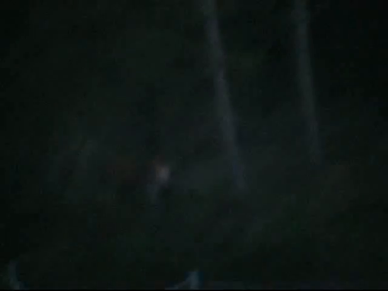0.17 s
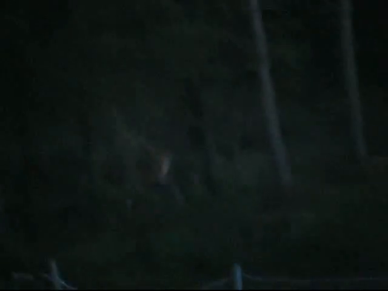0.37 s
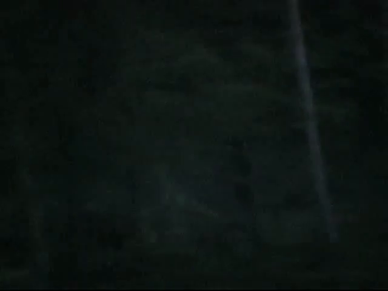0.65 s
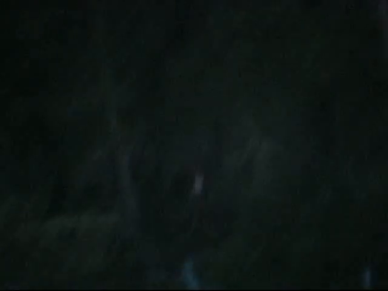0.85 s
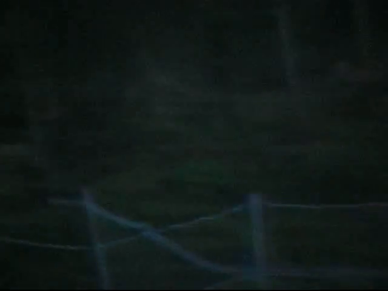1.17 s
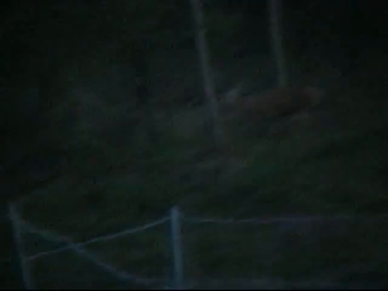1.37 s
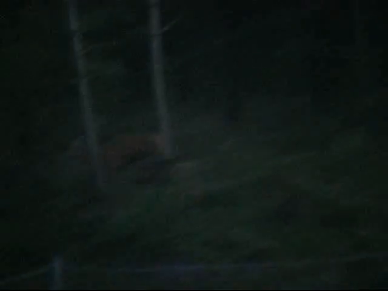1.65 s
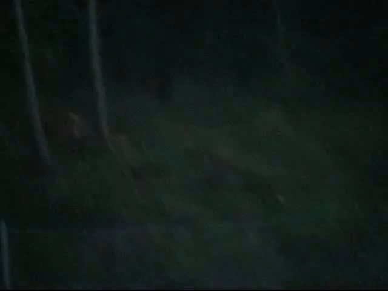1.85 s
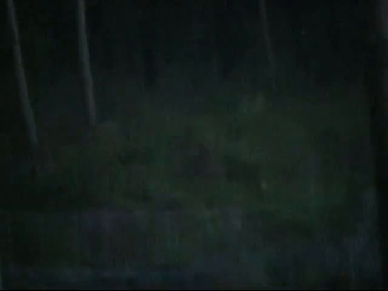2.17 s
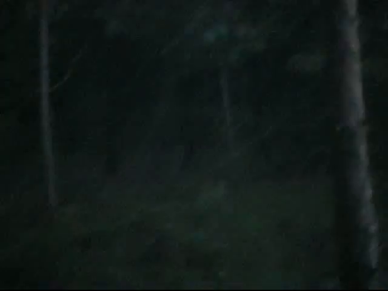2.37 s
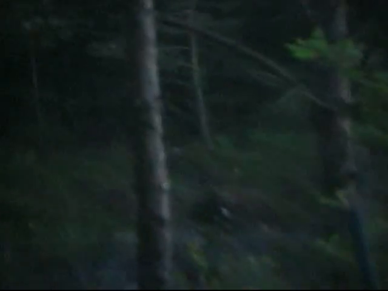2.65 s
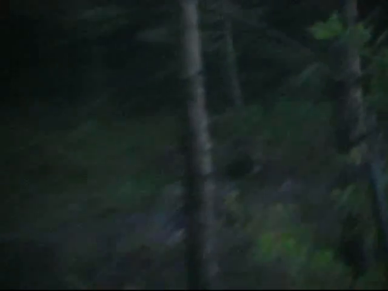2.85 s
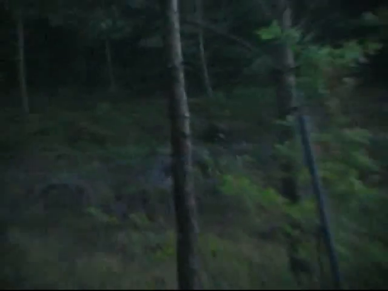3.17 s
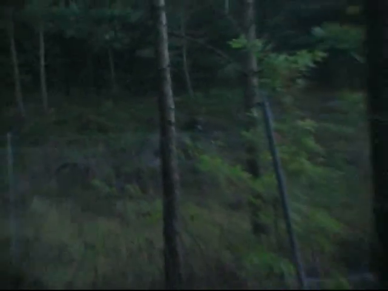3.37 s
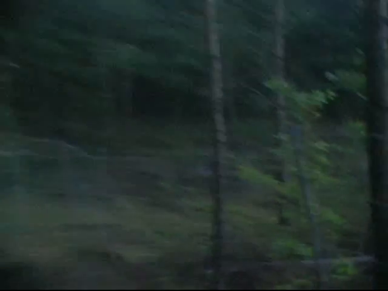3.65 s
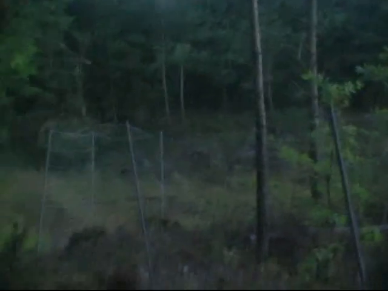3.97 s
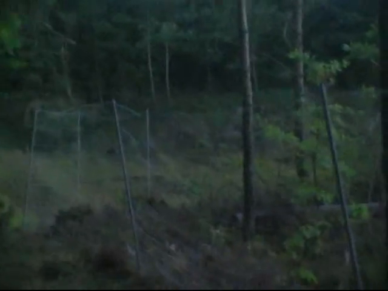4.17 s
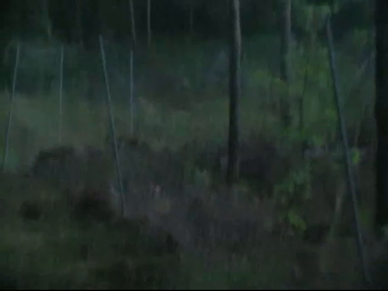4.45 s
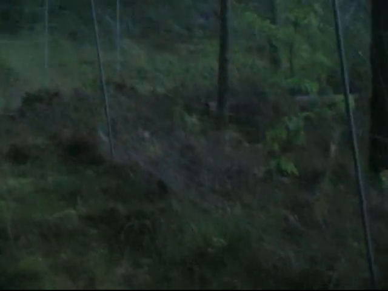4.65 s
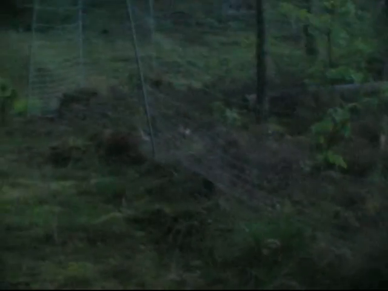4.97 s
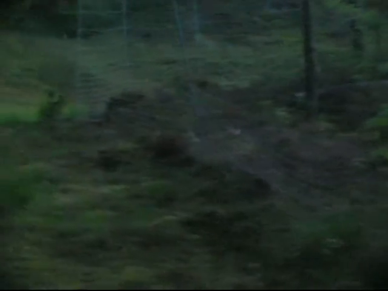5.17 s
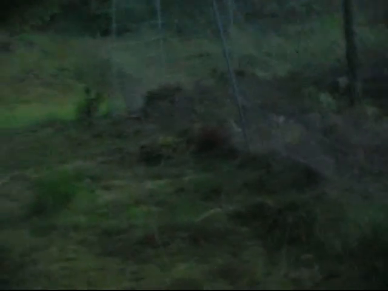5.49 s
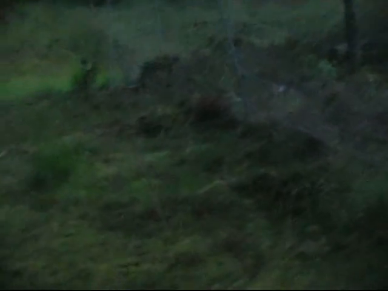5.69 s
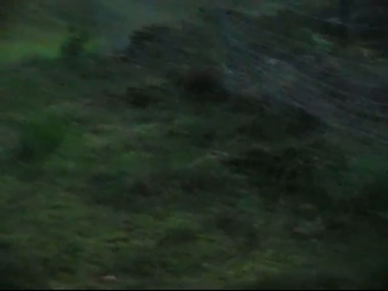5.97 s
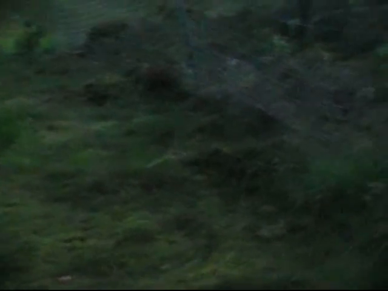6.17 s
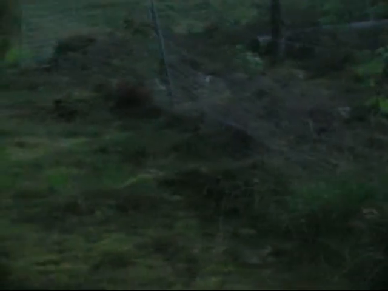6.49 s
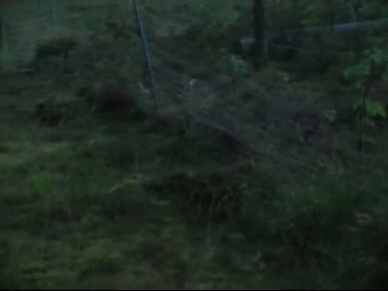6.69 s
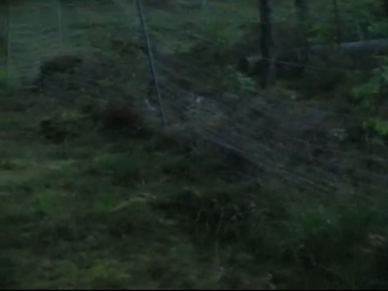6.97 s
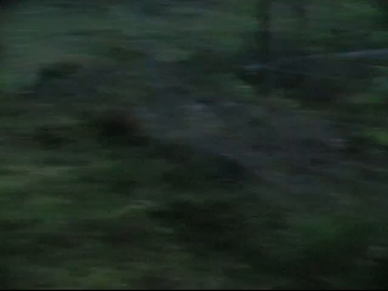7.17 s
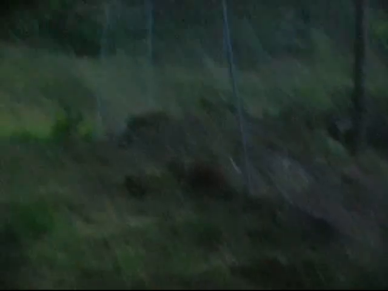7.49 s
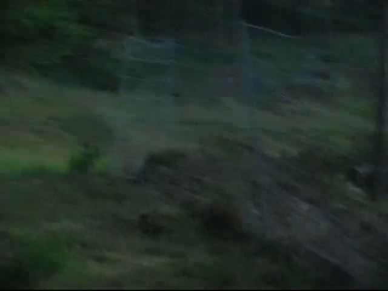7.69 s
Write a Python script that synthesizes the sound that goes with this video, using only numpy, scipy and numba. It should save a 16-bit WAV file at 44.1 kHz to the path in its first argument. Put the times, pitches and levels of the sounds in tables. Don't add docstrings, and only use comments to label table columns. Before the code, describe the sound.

Mono hand-held microphone outdoors: low wind thumps, steady hum and dull hiss throughout. After a far groan, a stag gives a rough, deep roar that breaks into hoarseness, then a shorter, purer bellow. Thin distant moans drift behind. Hands click and bump the casing, hardest midway, clothing rubs and leaves shuffle; a short creaking growl and a weak new roar close the scene.

```python
import sys
import numpy as np
from scipy import signal
from scipy.fft import rfft, irfft
from scipy.io import wavfile
from scipy.ndimage import uniform_filter1d, map_coordinates
from numba import njit

SR = 44100
rng = np.random.default_rng(int(sys.argv[2]) if len(sys.argv) > 2 else 0)


def transcribe(u):
    v = np.clip(np.atleast_2d(u).T, -1, 1)
    q = np.round(v * 32767).astype(np.int16)
    wavfile.write(sys.argv[1], SR, q)


def amplitude_ratio(level_db):
    exponent = np.asarray(level_db, float) / 20
    return 10 ** exponent


N = 345258


def rms_one(x):
    return x / np.sqrt(np.mean(x ** 2) + 1e-20)


def in_time(rows):
    s, *columns = np.transpose(rows)
    return [np.interp(np.arange(N) / SR, s, c) for c in columns]


def gate(rows, fade_s=0.012):
    t = np.arange(N) / SR
    return np.clip(np.minimum(t - rows[0][0], rows[-1][0] - t) / fade_s, 0, 1)


def at_hz(points, hz):
    point_hz, point_value = np.transpose(points)
    return np.interp(np.log(hz + 1), np.log(point_hz), point_value)


def drift(rate):
    knots = rng.standard_normal(400)
    return map_coordinates(knots, [np.arange(N) / SR * min(rate, 45)], order=3)


def coloured(spectrum):
    closed = [(spectrum[0][0] / 2, -60), *spectrum, (spectrum[-1][0] * 2, -90)]
    even = N + N % 2
    gain = amplitude_ratio(at_hz(closed, np.fft.rfftfreq(even, 1 / SR)))
    return rms_one(irfft(rfft(rng.standard_normal(even)) * gain)[:N])


def swells(rows, floor_db):
    t = np.arange(0, N + 64, 64) / SR
    power = amplitude_ratio(2 * floor_db)
    power = power + sum(amplitude_ratio(2 * db - 20 * np.abs(t - s) / fall_s) for s, db, fall_s in rows)
    return np.interp(np.arange(N) / SR, t, 10 * np.log10(power))


@njit
def resonate(x, w, r):
    y = np.zeros(len(x))
    for i in range(2, len(x)):
        y[i] = (1 - r * r) / 2 * (x[i] - x[i - 2]) + 2 * r * np.cos(w[i]) * y[i - 1] - r * r * y[i - 2]
    return y


def peak(x, hz, width_hz):
    return resonate(x + 1e-18, 2 * np.pi * hz / SR * np.ones(len(x)), np.exp(-np.pi * width_hz / SR))


def glottis(span, rate, rough, lead_s):
    turns = np.cumsum(rate * (1 + 0.25 * rough ** 2 * drift(40)[span])) / SR
    turns -= turns[int(lead_s * SR)]
    closing = np.diff(np.floor(turns), prepend=0) > 0
    strength = amplitude_ratio((0.27 + 3.2 * rough) * rng.standard_normal(200)[turns.astype(int) % 200])
    puff = rng.standard_normal(N)[span] * np.exp(-1.8 * (turns % 1))
    pulses = -strength * (1 - rough) * closing * np.sqrt(SR / rate)
    breath = strength * 1.8 * rough * puff
    return pulses, breath


GROUP_BORDERS_HZ = [720, 1450]


def ring_throat(pulses, breath, span, rough, lowered, shut, throat, shut_db):
    valley_fill = 0.17
    groups = np.zeros((3, len(pulses)))
    for k, (raised_hz, lowered_hz, width_hz, raised_db, lowered_db) in enumerate(throat):
        hz = raised_hz + (lowered_hz - raised_hz) * lowered
        hz = hz * (1 + 0.021 * rough * drift(14)[span])
        source = pulses + breath * (raised_hz / 900) ** 0.36
        broad = peak(source, hz, 4.15 * width_hz)
        rung = peak(broad, hz, width_hz) + valley_fill * rough * peak(broad, hz, 6.0 * width_hz)
        db = raised_db + (lowered_db - raised_db) * lowered + shut_db[k] * shut
        db = db + (1.5 + 2.4 * rough) * drift(9)[span]
        group = np.searchsorted(GROUP_BORDERS_HZ, raised_hz)
        groups[group] += (-1) ** k * amplitude_ratio(db) * rung / np.sqrt(width_hz)
    return groups / np.sqrt(uniform_filter1d(groups ** 2, size=3000, axis=1) + 1e-9)


# (return time [s], depth [dB], fade [s])
CATCHES = [
    (1.678, -8, .03),
    (1.744, -5, .02),
    (1.792, -5, .015),
    (1.815, -9, .015),
    (1.908, -9, .04),
    (2.03, -4, .03),
    (2.24, -5, .08),
]


def roar(effort, sinking, strain, throat, shut_db, jaw_s):
    jaw_takes_s = 0.03
    hoarse_start, settle_s = 1.4, 0.1
    pure_until, pure_fade = 0.62, 0.15
    span = slice(int(effort[0][0] * SR), int(effort[-1][0] * SR) + 2000)
    t = (np.arange(N) / SR)[span]
    rate, level_db, mouth_db = [c[span] for c in in_time(effort)]
    first_s, sink_s, sink_takes_s, high_raised_db, high_lowered_db = sinking
    steady, strained, break_s, break_takes_s, pure_db = strain

    lowered = np.clip((t - sink_s) / sink_takes_s, 0, 1)
    shut = np.clip((jaw_s - t) / jaw_takes_s + 0.5, 0, 1)
    broken = np.clip((t - break_s) / break_takes_s, 0, 1)
    hoarse = 1 + hoarse_start * np.exp((t[0] - t) / settle_s)
    rough = steady * hoarse + (strained - steady) * broken

    pulses, breath = glottis(span, rate, rough, first_s - effort[0][0])
    low, middle, high = ring_throat(pulses, breath, span, rough, lowered, shut, throat, shut_db)
    pure = np.clip((pure_until - rough) / pure_fade, 0, 1) * np.sqrt(2)
    pure = pure * np.sin(2 * np.pi * np.cumsum(rate) / SR)

    for s, db, fade_s in CATCHES:
        level_db = level_db + db * (t < s) * np.exp(-np.abs(t - s) / fade_s)
    high_db = high_raised_db + (high_lowered_db - high_raised_db) * lowered
    voice = amplitude_ratio(-mouth_db) * (low + amplitude_ratio(pure_db) * pure) + middle + amplitude_ratio(high_db) * high
    out = np.zeros(N)
    out[span] = amplitude_ratio(level_db) * voice
    return out * gate(effort)


# (time [s], pulse rate [1/s], level [dB], middle over low resonances [dB])
HARSH = [(1.54, 71, -69, -10), (1.57, 85, -54, -12), (1.69, 94, -36, -4), (1.8, 81, -33.5, -4.5),
         (1.95, 97, -34, -4), (2.04, 102, -34.5, -7), (2.1, 110, -32, -7.5), (2.36, 109, -38.5, -3),
         (2.47, 110, -46, -4)]
BRIGHT = [(3.01, 30.02, -74, -6), (3.05, 64, -47.5, 5), (3.11, 89, -45, 9), (3.19, 96, -39, 13),
          (3.27, 93.9, -38.5, 11), (3.53, 102.5, -37.5, 1), (3.66, 93, -39, -2.5), (3.728, 82, -44.5, 6),
          (3.76, 66, -67, -5)]
GROWL = [(5.93, 46, -73, 1), (5.968, 46, -46.5, 6), (6.121, 45.5, -43, 9), (6.163, 28, -46, 4),
         (6.19, 38, -49, 0), (6.26, 38, -47, -0.5), (6.355, 59, -44.5, -1), (6.368, 28, -50, -5),
         (6.6, 14, -68, -10)]
FOURTH = [(7.47, 88, -70, -7), (7.52, 92, -60, -4), (7.58, 100, -60, 2), (7.7, 103, -61, 3),
          (7.829, 101.3, -59, 0)]
GRUNT = [(1.33, 95, -76, -6), (1.42, 94, -61, 10), (1.484, 92, -62.5, 14), (1.54, 90, -63.5, 0.5)]
EFFORT = [HARSH, BRIGHT, GROWL, FOURTH, GRUNT]
# (first closure [s], sinking starts [s], sinking takes [s],
# high over middle resonances raised [dB], lowered [dB])
SINKING = [
    (1.55, 1.63, .4, -12, -9.5),
    (3.027, 2.98, 0.71, 0, -0.7),
    (5.945, 5.99, 0.265, -13, -1),
    (7.49, 7.49, .24, 2, 6),
    (1.37, 1.37, .19, 4, 4),
]
# (steady roughness [0-1], strained roughness [0-1], voice breaks [s],
# breaking takes [s], pure fundamental under the low resonances [dB])
STRAIN = [
    (.32, .76, 2.0, .12, -10),
    (.07, .21, 3.6, .11, -9),
    (.22, .46, 6.17, .26, -30),
    (.2, .2, 7.8, .1, -25),
    (.4, .6, 1.4, .1, -12),
]
# (larynx raised [Hz], lowered [Hz], width [Hz], level raised [dB], lowered [dB])
HARSH_THROAT = [(469, 385.4, 52, 2, 0), (712, 500, 45, 0, -0.5), (1120, 769, 55, 2.5, -7),
                (1235, 1094, 59, -3, -2.5), (1447, 1253, 49, -20, -10), (1612, 1410, 46, -19, -14),
                (1980, 1620, 25, -26.5, -22.5), (2246, 1930, 25, -20, -22.5), (2370, 2200, 84, -21, -18.5),
                (2626, 2420, 80, -24, -19.5), (2950, 2830, 130, -30, -27), (3355, 3316, 86, -32, -27),
                (4100, 3900, 500, -38, -40), (5700, 5570, 1000, -42, -45)]
BRIGHT_THROAT = [(222, 210, 88, -6, -14), (540, 465, 46, 0, 3), (793, 725, 53, -7.5, -3.5),
                 (1156, 1103, 100, -12, -4), (1352, 1252, 44, 0.5, -4.5), (1698, 1540, 61, -3, 0.5),
                 (1985, 1926, 93, -1.5, -7), (2170, 2140, 41, -14, -5), (2460, 2427, 70, 0, -5.5),
                 (2770, 2750, 30, -25, -17), (3260, 3150, 64, -22, -15)]
GROWL_THROAT = [(426, 381.5, 35, -18, -4), (600, 514, 38, -6, -5), (971, 836, 26, 1.5, 0),
                (1076, 995, 52, -2.5, -8), (1414, 1260, 29, -11.5, -6), (1673, 1520, 28, -12, -12),
                (1820, 1790, 70, -33, -12), (2280, 2130, 33, -20, -13.5), (2350, 2330, 51, -13, -14),
                (2520, 2480, 75, -17, -14.5), (2890, 3100, 36, -30, -26.5), (3340, 3250, 82, -27, -30.5)]
FOURTH_THROAT = [(477, 470, 150, 0, -6), (820, 740, 160, -1, -6), (1370, 1320, 300, -3, -6),
                 (2280, 2240, 200, 4, 2), (2790, 2740, 290, -3, -1), (3200, 3180, 260, -2, 0),
                 (4500, 4500, 370, -21, -23)]
GRUNT_THROAT = [(500, 990, 140, -0.5, 4), (900, 1100, 480, 0, 0), (1820, 1700, 210, 2, -1),
                (2040, 2080, 190, 9, 1)]
THROAT = [HARSH_THROAT, BRIGHT_THROAT, GROWL_THROAT, FOURTH_THROAT, GRUNT_THROAT]
HARSH_SHUT = [1, 1, -1, 1, 2, 2, 4, -1, -2, -1, -3, -3, -1, -1]
BRIGHT_SHUT = [1, 1, 1, -5, -9, 6, 2, 1, -2, -3, -10]
GROWL_SHUT = [-1, 1, 1, 1, 1, 1, -2, -2, -2, 1, -1, 1]
FOURTH_SHUT = [1, 1, 1, -1, -1, -1, -1]
GRUNT_SHUT = [1, 1, -3, -3]
SHUT_JAW = [HARSH_SHUT, BRIGHT_SHUT, GROWL_SHUT, FOURTH_SHUT, GRUNT_SHUT]
JAW_DROPS_S = [1.675, 3.16, 6.22, 7.56, 1.42]


def roars():
    tables = zip(EFFORT, SINKING, STRAIN, THROAT, SHUT_JAW, JAW_DROPS_S)
    return np.array([roar(*each) for each in tables])


# (frequency [Hz], time to fall 60 dB [s])
FOREST_T60 = [(200, 2.8), (500, 3.08), (1200, 1.62), (1700, 1.85), (2500, 1.56), (3500, 1.93), (6000, 0.66)]
SCATTER_DB = [-6, -10, -8.5, -5.5, -4.5]


def forest(calls):
    trunk_delay_s = 0.026
    t, tail = np.arange(3 * SR) / SR, 0
    edges = 150 * 2 ** np.arange(0, 6, 0.5)
    for low, high in zip(edges, edges[1:]):
        half_octave = signal.butter(2, [low, high], "band", fs=SR, output="sos")
        band = signal.sosfilt(half_octave, rng.standard_normal(len(t)))
        tail = tail + band * amplitude_ratio(-60 * t / at_hz(FOREST_T60, np.sqrt(low * high)))
    tail *= 1 - np.exp(-(t / trunk_delay_s) ** 2)
    tail /= np.sqrt(np.sum(tail ** 2) * SR / 2 / edges[-1])
    return signal.fftconvolve(amplitude_ratio(np.array(SCATTER_DB)) @ calls, tail)[:N]


# (time [s], pitch [Hz], level [dB])
MOANS = [
    [(2.55, 214, -53), (2.9, 199.9, -54), (2.948, 174, -63), (3.0, 175, -46)],
    [(3.3, 202, -49), (3.43, 207.6, -44.5), (3.704, 224, -48.5), (3.76, 225, -48)],
    [(5.97, 173, -46.5), (6.166, 176, -58), (6.214, 184, -58), (6.3, 173, -51)],
]
# (time [s], level [dB])
GROAN = [
    (0.75, -92),
    (0.794, -74),
    (0.884, -92),
    (0.938, -59.5),
    (1.404, -61),
    (1.5, -88),
]


def far_animals():
    groan = rms_one(peak(rng.standard_normal(N), 370, 44))
    out = amplitude_ratio(in_time(GROAN)[0]) * gate(GROAN, 0.065) * groan
    for rows in MOANS:
        hz, db = in_time(rows)
        partial = np.sqrt(2) * np.sin(2 * np.pi * np.cumsum(hz) / SR)
        out += amplitude_ratio(db + 1.4 * drift(14)) * gate(rows, 0.027) * partial
    return out


# (time [s], shell peak [dB], thud [dB], snap [dB], length [s])
KNOCKS = [(0.163, -45.5, -55, -57.5, 0.019), (.589, -50, -30.5, -75, 0.028), (2.298, -42, -31, -63, 0.034),
          (2.904, -42, -50, -62, .008), (3.009, -38, -35, -64, .02), (4.097, -35, -38, -55, 0.012),
          (4.361, -40, -50, -50.5, 0.0039), (4.501, -20, -32, -35.5, 0.0076),
          (4.508, -20, -26.5, -44, 0.0082), (4.518, -27, -33, -45, 0.0095),
          (4.567, -39.5, -38.5, -54, .008), (4.608, -29.5, -50, -55, 0.0034), (4.635, -54, -55, -45, .006),
          (4.647, -37, -56, -40, 0.006), (5.452, -27, -42.5, -49, 0.003), (5.633, -41, -62, -70, 0.0073),
          (5.729, -35.5, -57, -54, 0.0052), (7.249, -49, -51, -69, 0.012), (7.5, -40, -35, -53, 0.0094)]
# (frequency [Hz], level [dB], time to fall 60 dB [s])
CASING = [(98.5, -1, 0.066), (190.5, 2, 0.058), (271, -8, 0.036), (420, -7, .02), (600, -1, 0.024),
          (750, -1, .028), (960, -17, 0.012), (1650, -7, .006), (2350, 1.5, 0.008), (3500, -7, 0.0073),
          (4800, -7, 0.0062)]
SHELL_HZ = [350, 1300]


def knocks():
    size = 8000
    out, t = np.zeros(N + size), np.arange(size) / SR
    for s, shell_db, thud_db, snap_db, length in KNOCKS:
        start = int(s * SR)
        contact = rng.standard_normal(size) * np.exp(-t / max(length, 0.001) * 2.0)
        contact = contact * np.minimum(t / 0.0006, 1)
        for hz, db, t60 in CASING:
            rung = peak(peak(contact, hz, 0.32 * hz), hz, 2.54 / t60)
            part_db = (thud_db, shell_db - 5.5, snap_db)[np.searchsorted(SHELL_HZ, hz)]
            out[start:start + size] += amplitude_ratio(db + part_db) * rung / np.abs(rung).max()
    return signal.sosfilt(signal.butter(3, 5600, fs=SR, output="sos"), out[:N])


# (time [s], peak [dB], centre [Hz])
TICKS = [(.277, -50.5, 3500), (.314, -55, 4700), (1.41, -60, 3980), (1.895, -45, 5000), (3.266, -55, 6000),
         (3.307, -60, 6500), (3.425, -55, 5510), (3.48, -59, 9000), (3.659, -47, 11500), (4.109, -56, 4500),
         (4.428, -58, 9000), (4.461, -53, 5500), (5.25, -59, 9000), (5.31, -59, 11000), (5.37, -55, 12000),
         (5.464, -54, 4700), (5.702, -45, 3600), (5.799, -52, 9900), (6.259, -60, 9000), (6.399, -57, 4200),
         (7.497, -58, 7000)]


def ticks():
    size = 900
    out, t = np.zeros(N + size), np.arange(size) / SR
    for s, db, hz in TICKS:
        start = int(s * SR)
        burst = rng.standard_normal(size) * np.exp(-t / 0.0012)
        burst = peak(peak(burst, hz, 1.0 * hz), hz, 0.62 * hz)
        out[start:start + size] += amplitude_ratio(db + 2) * burst / np.abs(burst).max()
    return out[:N]


# (time [s], peak [dB])
JINGLES = [
    (4.402, -66),
    (4.414, -60),
    (4.428, -56),
]
# (frequency [Hz], level [dB], time to fall 60 dB [s])
RING = [(7700, 0, .05), (9300, -7, .06)]


def strap_ring():
    t, out = np.arange(N) / SR, np.zeros(N)
    for s, db in JINGLES:
        for hz, mode_db, t60 in RING:
            level = amplitude_ratio(db + mode_db - 60 * np.abs(t - s) / t60)
            out += (t > s) * level * np.sin(2 * np.pi * hz * (t - s))
    return out


# (centre [Hz], width [Hz], level [dB])
LENS = (1500, 350, -55.5)


def lens():
    start_s, steps_per_s = 7.503, 20
    hz, width_hz, db = LENS
    step = (np.arange(N) / SR - start_s) * steps_per_s
    strokes = (step > -0.5) * np.exp(-(((step + 0.5) % 1 - 0.5) / 0.16) ** 2)
    return amplitude_ratio(db) * strokes * rms_one(peak(rng.standard_normal(N), hz, width_hz))


# (time [s], peak [dB], time to fall 10 dB [s])
RUBS = [(.33, -74, 0.1), (1.63, -69, 0), (1.9, -71, 0.5), (3.27, -72, 0.3), (3.47, -67.5, 0.4),
        (4.43, -66, 0.18), (5.3, -71, 0.34), (5.79, -65.5, 0.17), (6.41, -67, 0.25), (7.68, -68, 0.25)]
# (frequency [Hz], density [dB per Hz])
RUSTLE = [(2500, 2.5), (4000, 0), (6000, -3.5), (9000, -11.5), (15500, -13)]


def rubbing():
    grains = amplitude_ratio(2.2 * np.minimum(rng.exponential(1, N // 64 + 1), 5)).repeat(64)[:N]
    return amplitude_ratio(swells(RUBS, -82)) * rms_one(grains * coloured(RUSTLE))


# (time [s], peak [dB], time to fall 10 dB [s])
SHUFFLE = [(1.1, -67.5, .5), (4.1, -58.5, 1.2), (4.65, -53, 0.42), (5.35, -54.5, 0.37), (5.8, -57, .5),
           (6.7, -59, 0.4), (7.52, -53.5, .19), (7.75, -53.5, 0.23)]
# (frequency [Hz], density [dB per Hz])
LEAVES = [(250, -2.5), (420, 7), (1000, -4), (2500, -14), (4500, -23.5)]


def shuffling():
    return amplitude_ratio(swells(SHUFFLE, -74) + 2.2 * drift(25)) * coloured(LEAVES)


# (time [s], peak [dB], time to fall 10 dB [s])
GUSTS = [(.03, -29, 0.13), (.62, -31, 0.14), (1.0, -36.5, .1), (1.4, -35.5, 0.17), (1.76, -30.5, 0.13),
         (1.96, -36, 0.1), (2.13, -28, 0.12), (2.25, -26.5, 0.19), (2.65, -28.5, 0.19), (3.12, -29, 0.13),
         (3.43, -37, 0.26), (3.6, -29.5, 0.14), (3.89, -33.5, 0.18), (4.17, -35, .12), (4.56, -26.5, 0.13),
         (4.8, -36, 0.17), (5.12, -32.5, 0.25), (5.55, -29.5, 0.23), (6.05, -34, .06), (6.2, -34, 0.05),
         (6.41, -34, 0.04), (6.97, -28.5, 0.1), (7.18, -29, 0.1), (7.45, -27.5, 0.2), (7.65, -25, 0.24)]
# (frequency [Hz], density [dB per Hz])
BUFFET = [(50, -12), (70, 2), (110, -6.5), (200, -10.5), (400, -25), (800, -37.5)]


def wind():
    rumble_db = swells(GUSTS, -47.5)
    rumble = coloured([(18, -13.5), (28, 4), (40, -2.0), (55, -9)])
    rumble /= np.sqrt(uniform_filter1d(rumble ** 2, size=6000))
    buffet_db = -49 + 0.45 * (rumble_db + 35.5) + 2.4 * drift(20)
    return amplitude_ratio(rumble_db) * rumble + amplitude_ratio(buffet_db) * coloured(BUFFET)


# (frequency [Hz], level [dB rms])
GEARS = [(3898, -90), (4048, -93), (4199, -87), (4500, -88), (15622, -94)]
# (frequency [Hz], density [dB per Hz])
HISS = [(170, -2.5), (260, -9), (400, -7), (600, -11), (1000, -17), (2000, -22.5), (3500, -29), (4500, -28),
        (6000, -33.5), (9000, -34), (15600, -38)]


def camera():
    motor_hz, motor_db, hiss_db = 149.5, -50, -60
    t = np.arange(N) / SR
    lines = sum(amplitude_ratio(db) * np.sin(2 * np.pi * hz * t) for hz, db in GEARS)
    lines += amplitude_ratio(motor_db + 0.7 * drift(3)) * np.sin(2 * np.pi * motor_hz * t + 0.2 * drift(4))
    return np.sqrt(2) * lines + amplitude_ratio(hiss_db + 0.5 * drift(6)) * coloured(HISS)


def scene():
    calls = roars()
    voices = calls.sum(0) + forest(calls) + far_animals()
    handling = knocks() + ticks() + strap_ring() + lens() + rubbing()
    background = shuffling() + wind() + camera()
    return (voices + handling + background)[None]


def top_cut(x):
    return signal.sosfilt(signal.butter(12, 15750, fs=SR, output="sos"), x)


def record(dry):
    return top_cut(dry)


dry = scene()
out = record(dry)
transcribe(out)
```